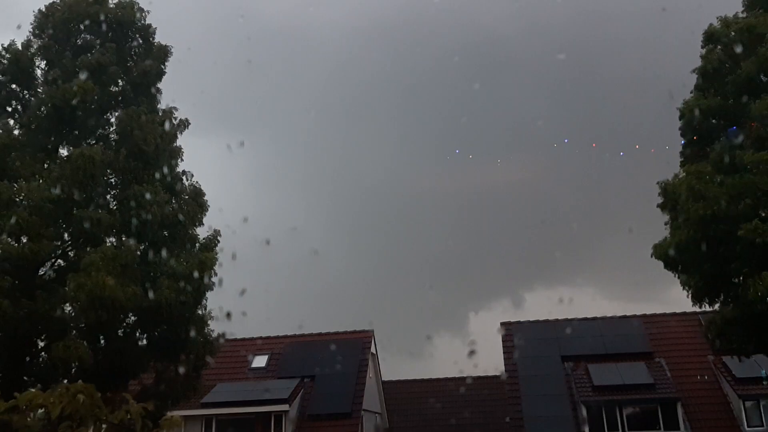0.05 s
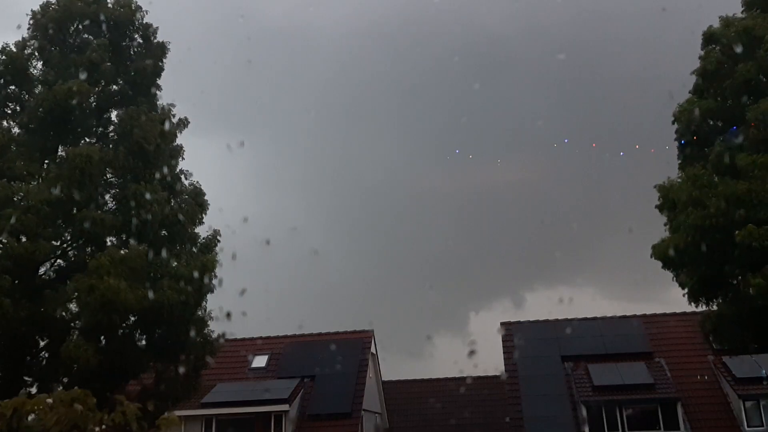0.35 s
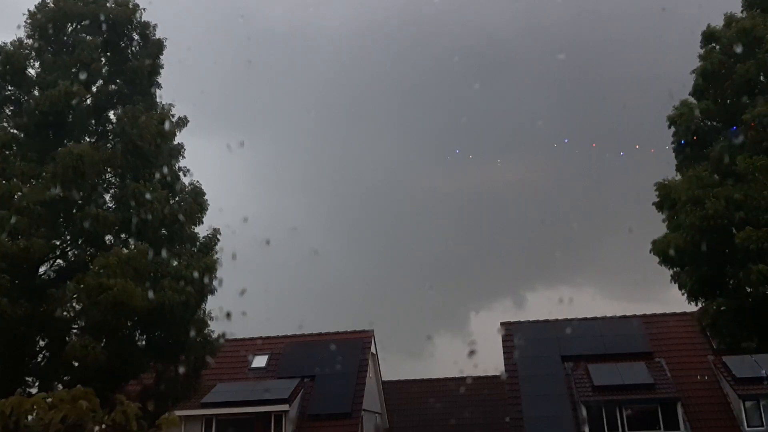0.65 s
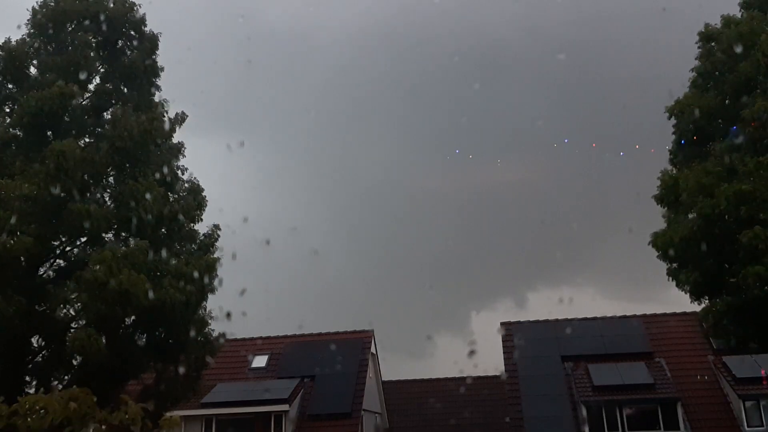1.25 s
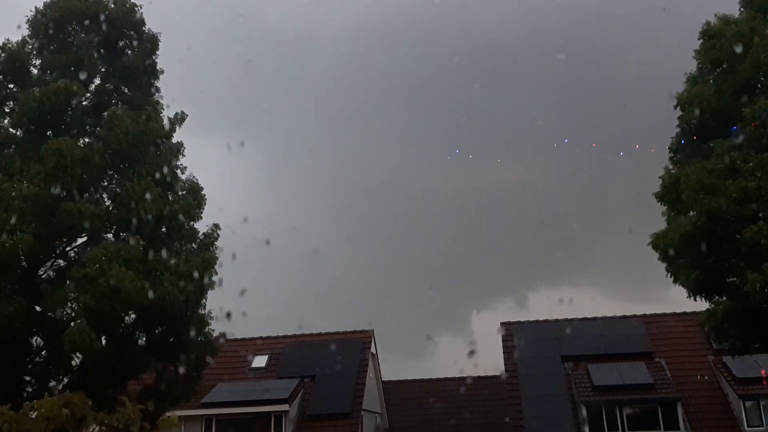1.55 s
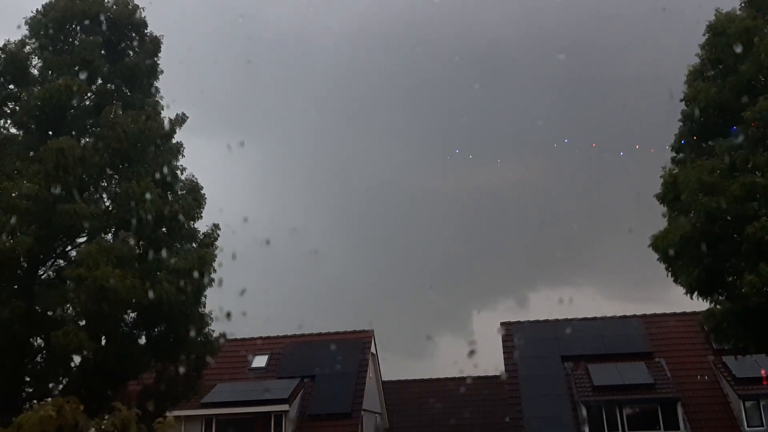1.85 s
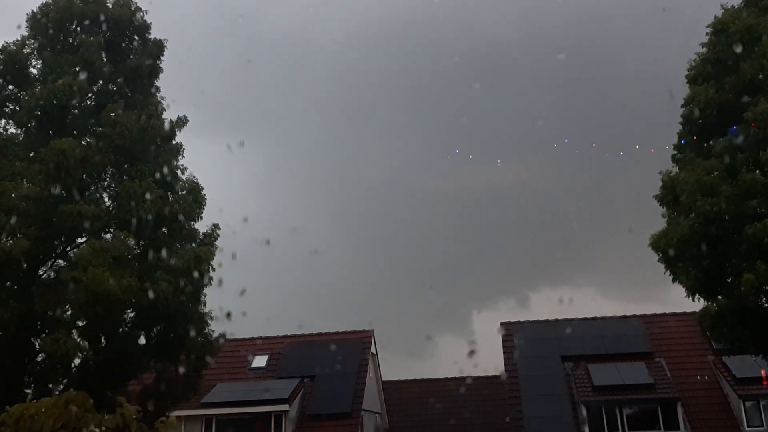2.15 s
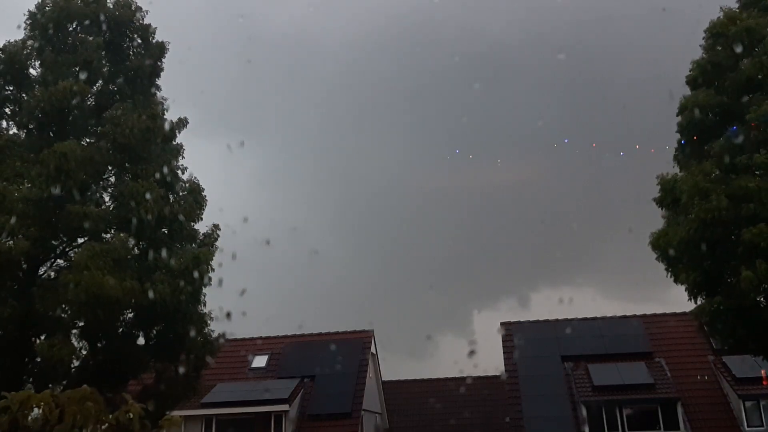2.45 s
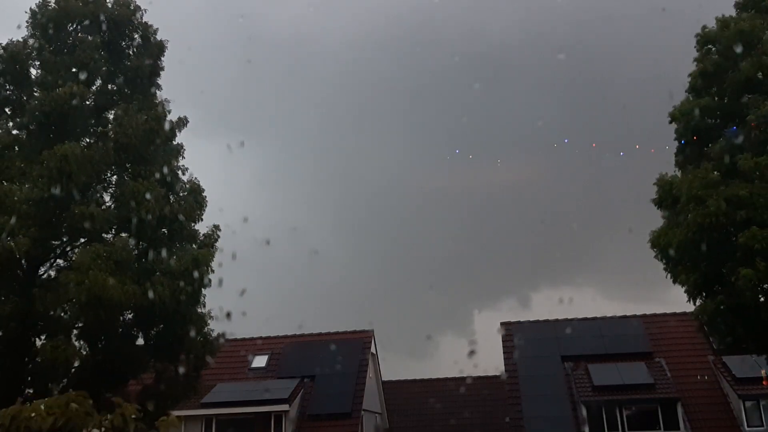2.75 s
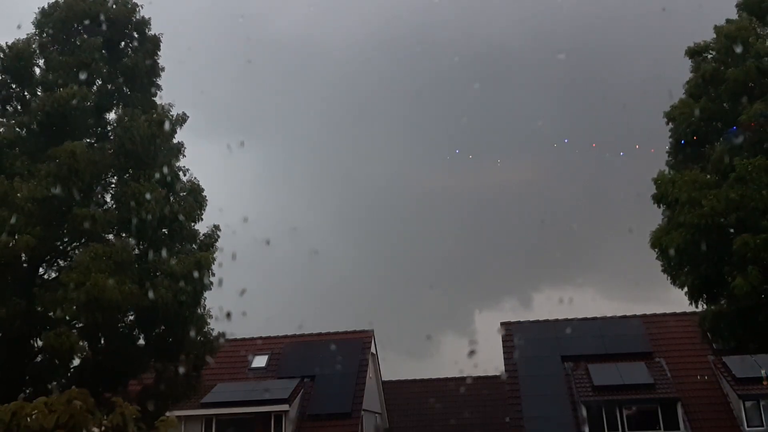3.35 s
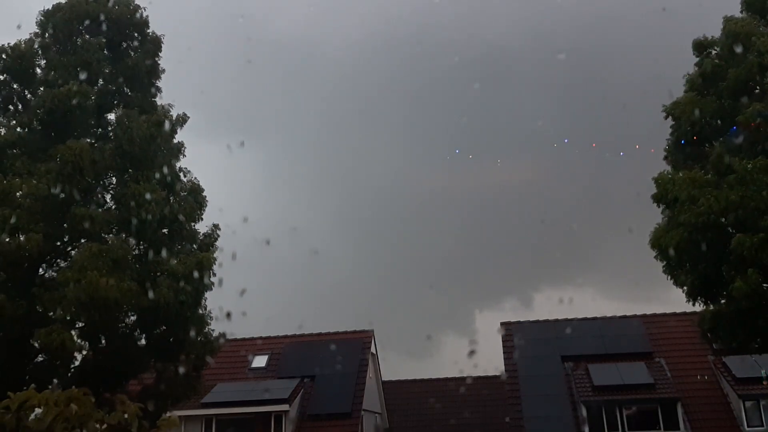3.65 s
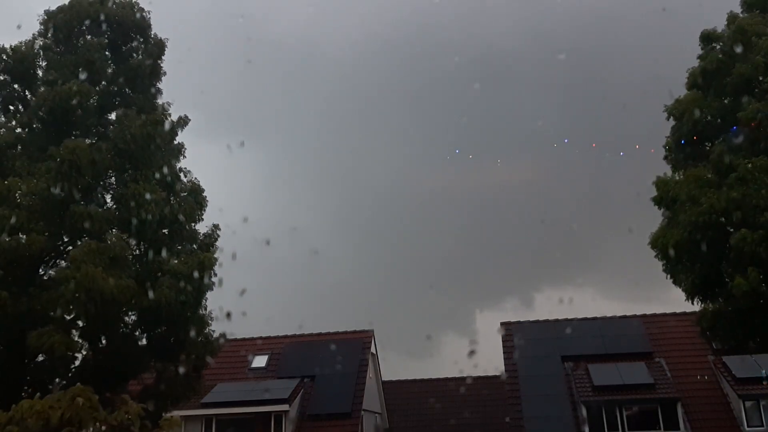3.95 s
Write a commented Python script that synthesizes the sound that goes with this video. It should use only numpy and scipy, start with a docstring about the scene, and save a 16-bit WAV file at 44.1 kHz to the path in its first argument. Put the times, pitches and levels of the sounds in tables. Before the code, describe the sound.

Distant thunder rumbles and booms over light steady rain, with drops ticking on a window.

```python
"""At a window in steady rain: distant thunder rolls on and the room booms at its own low resonances.
Single drops tick on the frame, and a few fat drips slap the sill and scatter into spray.
Behind them fine rain patters outside, its far impacts merging into hiss.
Thunder, rain and drops reach the right microphone slightly before the left."""
import sys
import numpy as np
from scipy import signal
from scipy.fft import rfft, irfft, next_fast_len
from scipy.io import wavfile
from scipy.ndimage import uniform_filter1d, map_coordinates

SR = 44100
rng = np.random.default_rng(int(sys.argv[2]) if len(sys.argv) > 2 else 0)


def output_pcm(signal):
    """Save a mono or channel-first signal as 16-bit PCM at the path in sys.argv[1].

    Samples are clipped to [-1, 1] before scaling.
    """
    pcm = np.clip(np.atleast_2d(signal).T, -1, 1) * 32767
    wavfile.write(sys.argv[1], SR, np.round(pcm).astype(np.int16))


N = 176400
TIME_S = np.arange(N) / SR
LEAD_S = 0.000429  # right microphone ahead of left


# Thunder envelopes in the room modes: time_s, level_db
RUMBLE_LEVEL = [(0.1, -46), (0.52, -41.5), (2.82, -46.5), (3.06, -40.5), (3.55, -48.5), (3.98, -41.5)]
BOOM_LEVEL = [(0.09, -36), (0.14, -27.5), (0.22, -40), (0.42, -36.5), (0.5, -34.5), (0.55, -37),
              (0.61, -29), (0.73, -38), (0.795, -28), (0.865, -45.5), (0.93, -30), (0.985, -39.5),
              (1.04, -29.5), (1.13, -40.5), (1.2, -36), (1.53, -36), (1.64, -46.5), (1.72, -32.5),
              (1.88, -41), (2.0, -46), (2.12, -42.4), (2.42, -47.5), (2.55, -38), (2.76, -45),
              (2.86, -36.5), (2.9, -42), (3.09, -32), (3.185, -39.5), (3.265, -32.5), (3.33, -50),
              (3.68, -37.5), (3.85, -50.5), (3.96, -34.5)]
# Room modes: centre_hz, width_hz, gain_db
RUMBLE_MODES = [(50.8, 7.2, 0.5), (83, 12.8, 3), (89.3, 8.3, 5.2), (116.5, 10.8, 5.4)]
BOOM_MODES = [(152.7, 5.75, 0)]

def thunder_boom():
    """Thunder drives the room: a deep rumble under one booming mode."""
    rumble = amp(curve(RUMBLE_LEVEL)) * resonate(RUMBLE_MODES, even_s=0.19)
    boom = amp(curve(BOOM_LEVEL)) * resonate(BOOM_MODES, even_s=0.0302)
    return rumble + boom


def resonate(modes, even_s):
    """Noise ringing in room modes, its level evened out over even_s."""
    def response(hz):
        ring = sum((-1) ** k * amp(db) * 1j * hz * width / (centre ** 2 - hz ** 2 + 1j * hz * width)
                   for k, (centre, width, db) in enumerate(modes))
        low_hz, high_hz = 0.7 * modes[0][0], 1.2 * modes[-1][0]
        return ring / np.sqrt((1 + (hz / high_hz) ** 6) * (1 + (low_hz / (hz + 1)) ** 4))
    ringing = unit(filtered(thunder_noise(), response))
    power = np.abs(uniform_filter1d(np.mean(ringing ** 2, axis=0), int(even_s * SR) + 1))
    return unit(ringing / np.sqrt(power + 0.02))


# Base envelopes of the roll and its edge: time_s, relative_db
ROLL_LEVEL = [(0.1, -44), (1.8, -43.5), (2.3, -46.5), (3.0, -47), (3.8, -47.5)]
EDGE_LEVEL = [(0.1, -53.5), (0.7, -54), (1.2, -57), (1.8, -56.5), (2.3, -61.5), (3.0, -61), (3.8, -60)]
# Their spectra: freq_hz, density_db
ROLL_SPECTRUM = [(120, -32), (190, -3.5), (213, 0), (232, -6.5), (260, 1), (310, -8), (345, -9), (395, -4),
                 (425, -10), (452, -5.5), (490, -14.5), (750, -25.5), (1400, -64), (4000, -120)]
EDGE_SPECTRUM = [(250, -11.5), (520, -4.5), (780, 0.5), (1030, -3), (1300, -13.5), (1900, -22),
                 (3000, -34.5), (6000, -45), (9000, -120)]
# Surges: centre_s, roll_lift_db, edge_lift_db, half_width_s
SURGES = [(0.082, 3.5, 7.5, 0.092), (0.495, 5.5, 3, 0.05), (0.77, 4, 6, 0.045), (0.983, 6, 6.5, 0.031),
          (1.37, 5.5, 4.5, 0.04), (3.93, 4, 0.5, 0.1)]

def thunder_roll():
    """A dull, lumpy roll that surges; its rougher edge fades as the thunder recedes."""
    roll_db, edge_db = curve(ROLL_LEVEL), curve(EDGE_LEVEL) + 3
    for centre_s, roll_lift_db, edge_lift_db, half_width_s in SURGES:
        swell = np.exp(-((TIME_S - centre_s) / half_width_s) ** 2)
        roll_db += roll_lift_db * swell
        edge_db += edge_lift_db * swell
    lumps = amp(1.1 * wobble(13) + 0.86 * wobble(70))
    roll = amp(roll_db) * coloured(thunder_noise() * lumps, ROLL_SPECTRUM)
    edge = amp(edge_db) * coloured(thunder_noise() * lumps, EDGE_SPECTRUM)
    return roll + edge


# Left-right likeness of thunder: freq_hz, coherence
THUNDER_COHERENCE = [(150, 1), (260, 0.77), (500, 0.69), (1200, 0.36), (2500, 0)]

def thunder_noise():
    """Stereo noise, nearly mono in the bass."""
    def mid_side_gains(hz):
        angle = np.arccos(along(THUNDER_COHERENCE, hz)) / 2
        return np.array([np.cos(angle), np.sin(angle)])
    mid, side = filtered(rng.standard_normal((2, N)), mid_side_gains)
    return np.array([mid + side, mid - side])


# Drops on the frame: start_s, relative_db, pitch_hz, left_minus_right_db
FRAME_DROPS = [(0.3876, -40.5, 5430, 1), (0.6574, -42, 5250, -1), (1.0605, -37.5, 4450, 4),
               (1.4584, -38.5, 6700, -3), (1.9583, -39.5, 6440, 0), (2.034, -42, 4400, -4),
               (2.146, -37, 4960, -4), (2.2134, -44.5, 6250, -6), (2.6283, -42, 8900, -6),
               (2.6564, -42, 4350, 1), (2.7103, -38.5, 5070, 0), (2.7594, -37, 6760, 4),
               (2.9227, -41.5, 4660, -1), (3.24, -49, 6220, -5), (3.481, -37, 6680, -2),
               (3.492, -38.5, 6100, -4), (3.8025, -42, 4830, 7)]
# Impact spectrum: freq_hz, density_db
CRACK_SPECTRUM = [(1000, -39), (2800, 1), (4200, 6.5), (7000, 12), (11000, 1.5), (13000, -27), (16000, -50)]

def frame_drops(gain_db=-3.5, rise_s=0.0004, ring_t60_s=0.017, crack_t60_s=0.0093):
    """Each drop hits the frame with a short wet crack and a damped ring."""
    out = np.zeros((2, N + SR))
    t = np.arange(SR // 10) / SR
    cracks = coloured(impacts(per_s=32000, spread_db=6), CRACK_SPECTRUM)
    rise = 1 - np.exp(-t / rise_s)
    for start_s, level_db, pitch_hz, pan_db in FRAME_DROPS:
        at = slice(round(start_s * SR), round(start_s * SR) + len(t))
        ring = 0.68 * np.sin(2 * np.pi * pitch_hz * t) * decay(t, ring_t60_s)
        crack = cracks[:, at] * decay(t, crack_t60_s)
        out[:, at] += amp(level_db + gain_db) * pan(pan_db) * rise * (ring + crack)
    return room(out[:, :N], wet_db=-1.5)


# Drips on the sill: start_s, relative_db, t60_s, slap_share, low_hz, high_hz
SILL_DRIPS = [(.305, -50.5, 0.49, 0.8, 2880, 3880), (1.063, -53, 0.88, 0.47, 2630, 6000),
              (1.651, -47, 0.22, 0.03, 2000, 14000), (1.731, -44, 0.18, 0, 2000, 18000),
              (2.032, -47, 0.5, 0.97, 600, 18000), (3.07, -58, 0.72, .98, 1500, 4250)]
# Splash spectra: freq_hz, density_db
SPRAY_SPECTRUM = [(3000, -17.5), (4000, -21), (5200, -3), (6200, -8), (7100, 4.5), (8000, -4), (9000, -15),
                  (10600, -7.5), (11300, -3), (12300, -28), (15000, -2), (16000, -18)]
SLAP_SPECTRUM = [(600, -12), (1200, 2), (1450, -9), (2300, -1.5), (4500, 2.5), (5600, -5.5), (12000, -9.5),
                 (15000, -6.5)]
# Sill modes: pitch_hz, gain_db
SILL_MODES = [(1195, -6.5), (1696, -14), (4312, -7), (4947, -7.5)]

def sill_splashes(grains_per_s=6300, rise_s=0.0015, treble_hz=11100, treble_t60_s=0.2, sill_t60_s=0.23):
    """A fat drip slaps the sill, rings it and scatters; the treble above about 11 kHz is faded fast."""
    out = np.zeros((2, N))
    spray = coloured(impacts(grains_per_s, spread_db=2), SPRAY_SPECTRUM)
    slap = coloured(impacts(grains_per_s, spread_db=3.5), SLAP_SPECTRUM)
    for start_s, level_db, t60_s, slap_share, low_hz, high_hz in SILL_DRIPS:
        t = np.maximum(TIME_S - start_s, 0)
        shower = np.sqrt(slap_share) * slap + np.sqrt(1 - slap_share) * spray
        body = filtered(shower, lambda hz: 1 / (1 + (hz / treble_hz) ** 20))
        splash = body * decay(t, t60_s) + (shower - body) * decay(t, treble_t60_s)
        ring = sum(amp(db) * np.sin(2 * np.pi * hz * t) for hz, db in SILL_MODES) * decay(t, sill_t60_s)
        rise = 1 - np.exp(-t / rise_s)
        band = lambda hz: 1 / np.sqrt((1 + (hz / high_hz) ** 10) * (1 + (low_hz / (hz + 1)) ** 10))
        out += amp(level_db) * filtered(rise * (splash + slap_share * ring), band)
    return out


# Rain envelope: time_s, relative_db
RAIN_LEVEL = [(0.1, -62.5), (0.62, -63), (1.0, -66), (1.2, -63), (1.5, -61), (1.87, -64.5), (2.25, -63),
              (2.85, -62.5), (3.4, -65.5), (3.62, -61.5), (3.95, -61)]
# Rain spectrum: freq_hz, density_db
RAIN_SPECTRUM = [(500, -3), (1800, -11), (2500, -13), (3100, -6.5), (3800, -1), (5700, -1), (6800, 0.5),
                 (7800, -3), (9700, -5), (11500, -11), (12500, -25), (14000, -49)]

def rain():
    """Far rain merges into hiss; nearer droplets patter on top."""
    hiss = amp(-1.5) * coloured(impacts(per_s=12000, spread_db=1), RAIN_SPECTRUM)
    near = amp(-1) * coloured(patter(), RAIN_SPECTRUM)
    level_db = curve(RAIN_LEVEL) + 2.5 + 0.72 * wobble(14)
    return amp(level_db) * (hiss + near)


def patter(count=4000, per_s=600, centre_hz=5860, spread_octaves=0.5, spread_db=3.5, t60_s=0.01):
    """Droplets land at random, each a tick with its own pitch, size and direction."""
    gap, size = rng.exponential(size=(2, count, 1))
    detune, side = rng.standard_normal((2, count, 1))
    t = np.arange(SR // 60) / SR
    pitch_hz = np.clip(centre_hz * 2 ** (spread_octaves * detune), 1000, 15650)
    ticks = np.sin(2 * np.pi * pitch_hz * t) + rng.standard_normal((count, len(t)))
    ticks *= amp(spread_db * np.minimum(size, 4)) * decay(t, t60_s)
    start_s = np.cumsum(gap, axis=0) / per_s
    channels = []
    for offset in (side, -side):
        arrival_s = np.abs(start_s + offset * LEAD_S / 2)
        at = (arrival_s * SR).astype(int) + np.arange(len(t))
        panned = ticks * amp(2 * offset)
        channels.append(np.bincount(at.ravel(), panned.ravel(), N)[:N])
    return room(np.array(channels), wet_db=1.5)


def impacts(per_s, spread_db, coherence=0.34):
    """Tiny random impacts in three trains of per_s each: left, right and common to both."""
    hits = (rng.random((3, N)) < per_s / SR) * rng.choice([-1, 1], (3, N))
    hits = hits * amp(spread_db * np.minimum(rng.exponential(size=(3, N)), 4))
    return np.sqrt(1 - coherence) * hits[:2] + np.sqrt(coherence) * hits[2]


def room(x, wet_db, t60_s=0.14):
    """Add the diffuse tail of the window recess and the room."""
    t = np.arange(SR // 3) / SR
    tail = rng.standard_normal((2, len(t))) * decay(t, t60_s)
    tail /= np.linalg.norm(tail[0])
    return x + amp(wet_db) * signal.fftconvolve(x, tail, axes=1)[:, :N]


def amp(db):
    """Decibels to gain."""
    return 10 ** (np.asarray(db) / 20)


def decay(t, t60_s):
    """Fall of 60 dB per t60_s."""
    return amp(-60 * t / t60_s)


def pan(left_minus_right_db):
    """Left and right gains."""
    return amp(left_minus_right_db * np.array([[0.5], [-0.5]]))


def unit(x):
    """Scale to rms 1."""
    return x / np.sqrt(np.mean(x ** 2) + 1e-20)


def along(points, hz):
    """Interpolate (freq_hz, value) rows on a log axis."""
    freq_hz, values = np.transpose(points)
    return np.interp(np.log(hz + 1), np.log(freq_hz + 1), values)


def curve(rows):
    """Interpolate (time_s, value) rows per sample."""
    return np.interp(TIME_S, *np.transpose(rows))


def wobble(knots_per_s):
    """Smooth random curve."""
    knots = rng.standard_normal(int(N * knots_per_s / SR) + 4)
    return map_coordinates(knots, [TIME_S * knots_per_s])


def filtered(x, response):
    """Apply a complex frequency response."""
    size = next_fast_len(N + SR // 2)
    hz = np.fft.rfftfreq(size, 1 / SR)
    return irfft(rfft(x, size) * response(hz), size)[..., :N]


def coloured(x, spectrum):
    """Shape by a spectrum, at rms 1."""
    return unit(filtered(x, lambda hz: amp(along(spectrum, hz))))


def right_lead(hz, corner_hz=150):
    """Phase response: right early, left late; the lead vanishes in the deepest bass."""
    lead_s = LEAD_S * hz ** 2 / (hz ** 2 + corner_hz ** 2)
    return np.exp(1j * np.pi * hz * lead_s * np.array([[-1], [1]]))


def scene():
    """Thunder and rain come from the right; the sill is straight ahead."""
    weather = thunder_boom() + thunder_roll() * pan(-1.2) + rain() * pan(-1) + frame_drops()
    return filtered(weather, right_lead) + sill_splashes()


def record(dry):
    """Quick fade-in, steep low-pass."""
    start_s, fade_s, cutoff_hz = 0.076, 0.015, 15650
    fade = np.clip((TIME_S - start_s) / fade_s, 0, 1)
    return filtered(dry * fade, lambda hz: 1 / (1 + (hz / cutoff_hz) ** 150))


dry = scene()
out = record(dry)
output_pcm(out)
```